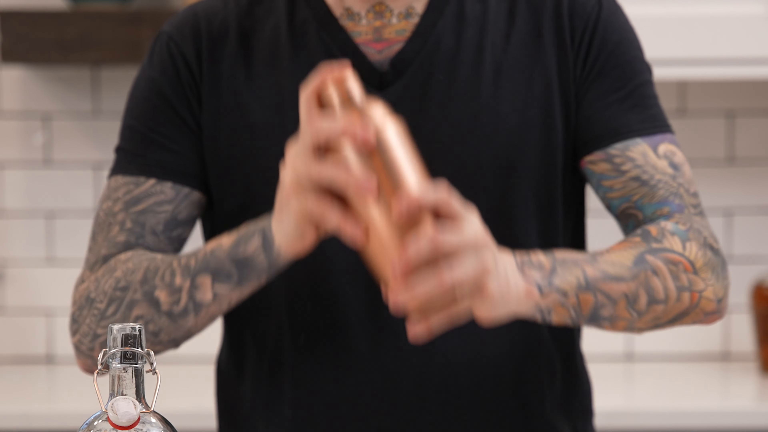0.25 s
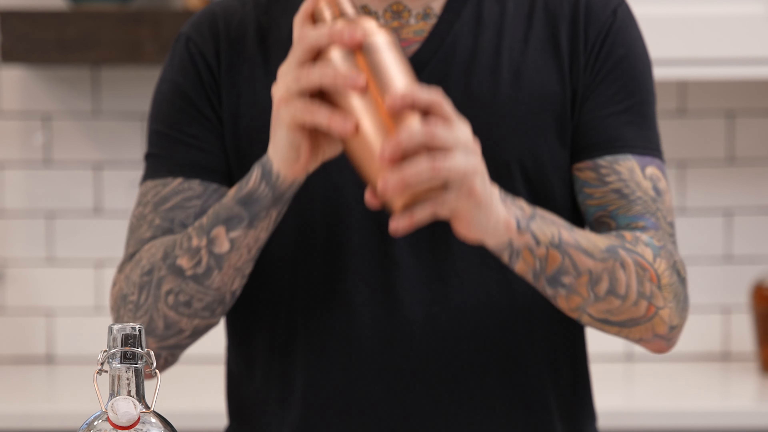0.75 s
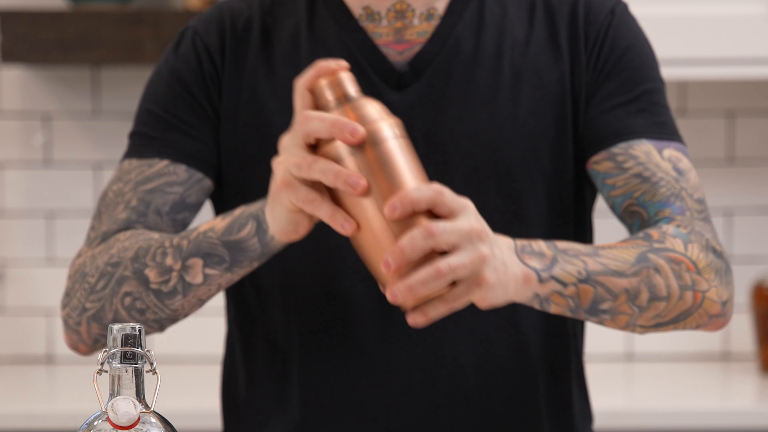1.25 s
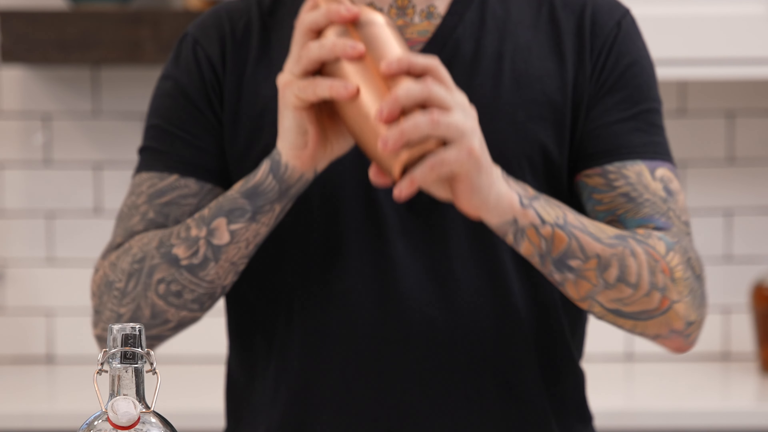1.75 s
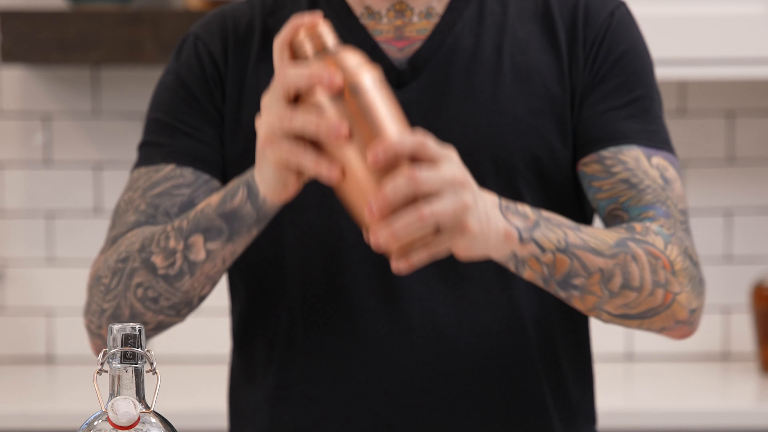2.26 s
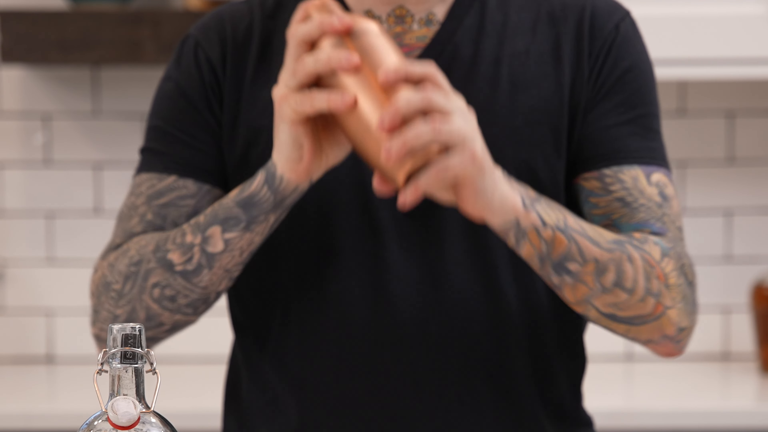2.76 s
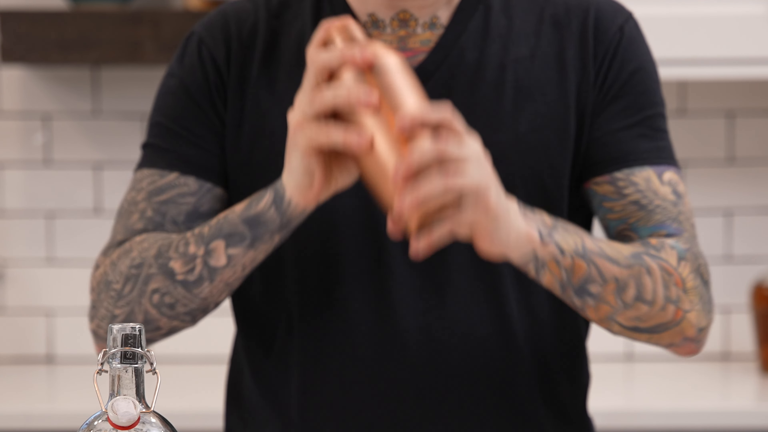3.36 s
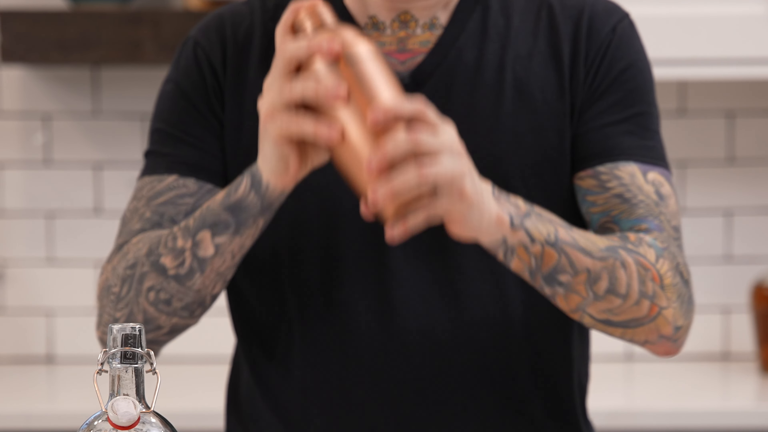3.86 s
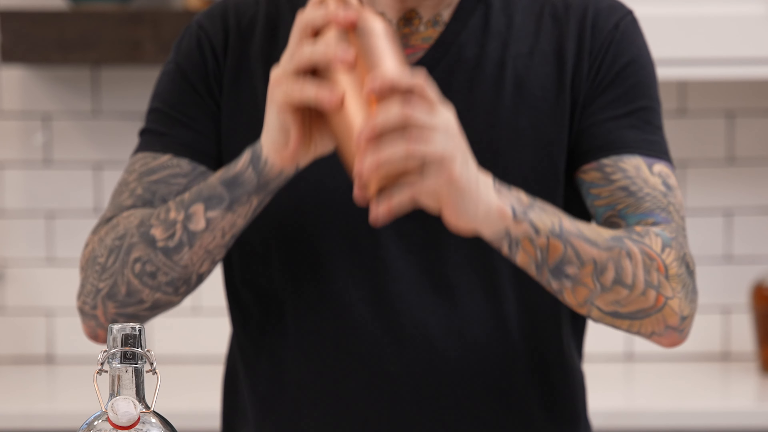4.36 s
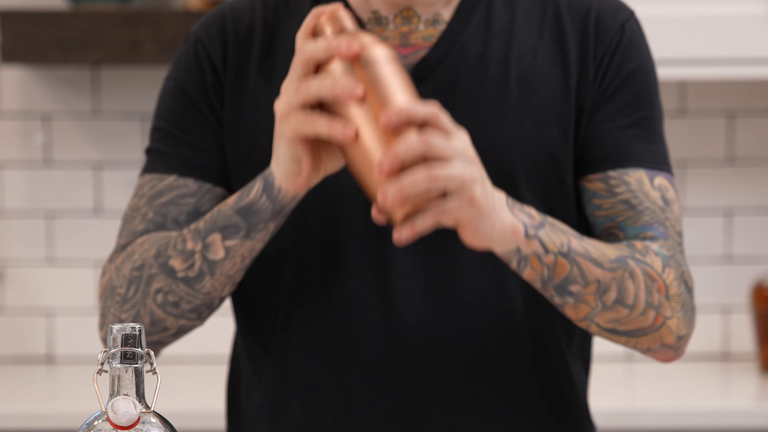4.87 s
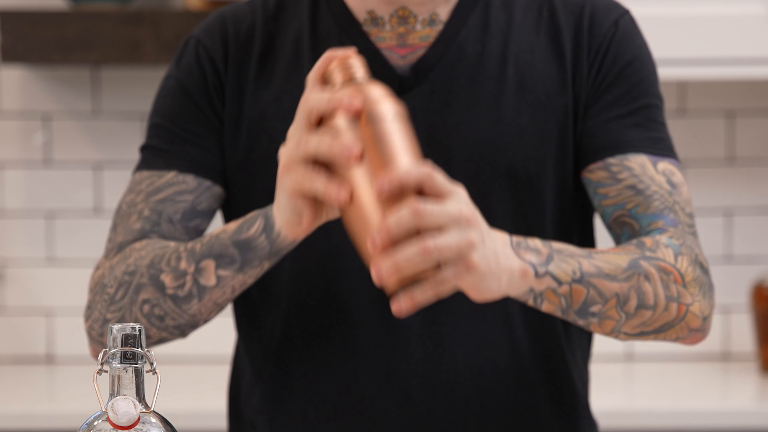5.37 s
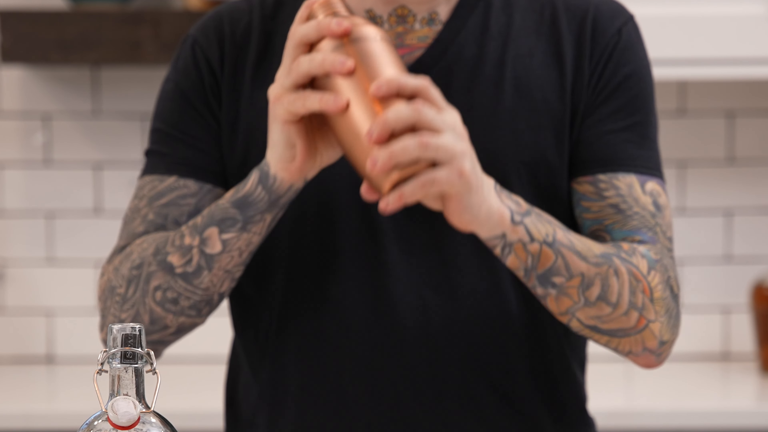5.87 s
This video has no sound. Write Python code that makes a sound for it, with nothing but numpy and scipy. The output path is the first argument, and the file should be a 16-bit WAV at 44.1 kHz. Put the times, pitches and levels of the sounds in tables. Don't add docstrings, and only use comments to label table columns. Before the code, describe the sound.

Vigorous cocktail shaking: about ten rattling ice impacts a second in a damped metal shell, sharp clacks over wet slosh, loud and slightly overdriven.

```python
import sys
import numpy as np
from scipy import signal
from scipy.fft import rfft, irfft, next_fast_len
from scipy.io import wavfile
from scipy.ndimage import uniform_filter1d, map_coordinates

SR = 44100
rng = np.random.default_rng(int(sys.argv[2]) if len(sys.argv) > 2 else 0)


def inscribe(sig):
    pcm = np.round(np.clip(np.atleast_2d(sig).T, -1, 1) * 32767)
    wavfile.write(sys.argv[1], SR, pcm.astype(np.int16))


def ratio(d):
    e = np.asarray(d, float) / 20
    return 10 ** e


N = 269892


def unit(x):
    return x / np.sqrt(np.mean(np.abs(x) ** 2) + 1e-20)


def along(points, hz):
    f, value = np.transpose(points)
    return np.interp(np.log(hz + 1), np.log(f + 1), value)


def filtered(x, response):
    m = next_fast_len(N + SR // 2)
    return irfft(rfft(x, m) * response(np.fft.rfftfreq(m, 1 / SR)), m)[:N]


def wobble(rate):
    knots = rng.standard_normal(int(N * rate / SR) + 4)
    return map_coordinates(knots, [np.arange(N) * rate / SR])


def ringing(x, modes):
    def response(f):
        total = 0
        for k, (centre, width, db) in enumerate(modes):
            damping = 1j * f * width
            total = total + (-1) ** k * ratio(db) * damping / (centre * centre - f * f + damping)
        return unit(total)
    return filtered(x, response)


# start_s, spread_s (of a pile-up), edge_db (re shell), heft_db (added to the body)
ICE = [
    (0, 0.017, -4.5, -3.5),
    (0.299, .011, -1.5, -0.5),
    (.9, .012, -7.5, 1),
    (1.5, .014, -7.5, 0.5),
    (2.3, .018, -6, -0.5),
    (3.5, .017, -3.5, 0.5),
    (4.5, .017, -2, 1),
    (6.1, .017, -2, -2),
]


def aged(s):
    when, *columns = np.transpose(ICE)
    return [np.interp(s, when, column) for column in columns]


# out_s, out_db, return_s, return_db
WARM_UP = [
    (.085, -15, 0.18, -14),
    (.293, -20, 0.39, -14),
    (.493, -15.5, .593, -16),
]
# out_s, out_db, return_s, return_db
SHAKES = [(.699, -15.5, .788, -15.5), (.89, -15.5, .976, -15.5), (1.075, -16, 1.164, -17),
          (1.267, -16, 1.354, -14), (1.461, -16.5, 1.546, -13.5), (1.647, -15.5, 1.745, -15.5),
          (1.85, -18, 1.938, -14), (2.04, -15.5, 2.133, -15), (2.242, -17.5, 2.338, -15),
          (2.442, -17.5, 2.528, -14), (2.639, -16, 2.735, -17), (2.836, -17.5, 2.926, -15),
          (3.031, -17.5, 3.125, -15.5), (3.233, -17, 3.32, -16.5), (3.429, -18, 3.515, -15.5),
          (3.625, -19, 3.711, -14.5), (3.82, -16.5, 3.912, -16), (4.022, -16.5, 4.114, -15.5),
          (4.221, -17, 4.312, -15), (4.413, -17.5, 4.507, -15), (4.608, -17, 4.709, -14),
          (4.816, -17, 4.908, -15), (5.027, -18.5, 5.112, -16), (5.215, -16.5, 5.311, -13.5),
          (5.415, -17, 5.511, -16), (5.613, -18.5, 5.705, -15), (5.806, -19.5, 5.899, -14.5),
          (6.001, -14.5, 6.091, -15)]


def strokes():
    s, db = np.reshape(np.concatenate([WARM_UP, SHAKES]), (-1, 2)).T
    back = np.arange(len(s)) % 2
    spread, edge_db, heft_db = aged(s)
    spread = spread * 1.12 ** back
    body_db = np.where(back, -6, 0.5) + heft_db
    return np.transpose([s, spread, db, body_db, edge_db - 2 * back])


# pitch_hz, t60_s
KITCHEN = [(200, 0.04), (2000, 0.41), (10000, 0.2)]


def kitchen(x, count=12):
    hz, t, z = signal.stft(rng.standard_normal((count, SR // 2)), SR, nperseg=256)
    decay = ratio(-60 * t / along(KITCHEN, hz)[:, None])
    tails = signal.istft(z * decay, SR, nperseg=256)[1]
    turn = np.arange(N) * 10 // SR % count == np.arange(count)[:, None]
    wet = signal.fftconvolve(x * turn, tails / np.linalg.norm(tails[0]), axes=1)
    return wet.sum(0)[:N]


def surge(rise, fall):
    t = np.arange(0, N, 32) / SR
    load = np.zeros(len(t))
    for s, spread, db, *_ in strokes():
        u = (t - s) / spread + 0.33
        load += ratio(db) * np.exp(-0.5 * (u / np.where(u < 0, rise, fall)) ** 2)
    return load.repeat(32)[:N]


# pitch_hz, level_db (per Hz)
SLOSH = [(15, -47), (25, -6.5), (249, -16.5), (503, -5), (1480, -5), (2110, 5.5), (2690, -2.5),
         (8360, -18.5), (16000, -28.5)]


def slosh():
    def wash_colour(f):
        return ratio(along(SLOSH, f) - 0.24 * np.log2(f / 4000 + 1))

    def spray_colour(f):
        return ratio(along(SLOSH, f) + 0.5 * np.log2(f / 2000 + 0.05))

    wash = unit(filtered(rng.standard_normal(N), wash_colour))
    spray = unit(filtered(rng.standard_normal(N), spray_colour))
    steady = ratio(-30.5 + 4.6 * wobble(90)) * wash
    return steady + ratio(-7 + 5.1 * wobble(300)) * surge(rise=1.0, fall=1.33) * spray


# start_s, peak_db
JOLT = [(0, -25.5), (2.5, -33.5), (6.1, -44)]
# start_s, peak_db, contact_s
THUDS = [
    (0.2936, -24, 0.0004),
    (.302, -15, 0.00106),
    (0.386, -7.5, 0.001),
    (3.607, -9, 0.0012),
]


def jolts():
    s = strokes().T[0]
    late, size, soft = rng.standard_normal((len(s), 3)).T
    back = np.arange(len(s)) % 2
    start_s = s + 0.004 + 0.0027 * late
    peak_db = np.interp(s, *np.transpose(JOLT)) + 2.5 * back + 1.1 * size
    usual = np.transpose([start_s, peak_db, 0.0045 * np.exp(0.27 * soft)])
    air = np.zeros(N + SR)
    for start, db, contact in [*usual, *THUDS]:
        u = np.arange(SR // 8) / (contact * SR)
        air[round(start * SR):][:len(u)] -= ratio(db + 7.5) * u * (2 - u) * np.exp(-u)
    return air[:N]


def notes(times, db, hz, t60, rise=0.00071):
    t = np.arange(SR // 25) / SR
    envelope = ratio(db[:, None] - 60 * t / t60[:, None]) * (1 - np.exp(-t / rise))
    wave = envelope * np.sin(2 * np.pi * hz[:, None] * t)
    at = np.clip(np.round(times * SR).astype(int)[:, None] + np.arange(len(t)), 0, N)
    return np.bincount(at.ravel(), wave.ravel(), N + 1)[:N]


# start_s, level_db (re the pile-up)
SING = [(0, -17), (1.5, -16), (2.5, -5), (4.3, -2.5), (6.1, -9)]


def singing(count=6):
    s, spread, db = strokes().T[:3, :, None]
    when, tune, force = np.moveaxis(rng.standard_normal((len(s), count, 3)), 2, 0)
    hz = 2070 * np.exp(0.0464 * (tune[:, :1] + 0.33 * tune))
    level_db = db + np.interp(s, *np.transpose(SING)) + 1.8 * force
    t60 = np.full(hz.shape, 0.037)
    return notes(*[r.ravel() for r in (s + spread * when, level_db, hz, t60)])


def chips(count=26):
    s, spread, db = strokes().T[:3, :, None]
    when, tune, life, force = np.moveaxis(rng.standard_normal((len(s), count, 4)), 2, 0)
    hz = np.clip(2970 * np.exp(0.7 * tune), 500, 12000)
    times = s + spread * (0.3 + 1.3 * when)
    level_db = db - 0.5 + 4 * force - 1.8 * np.abs(when)
    t60 = 5 / hz * np.exp(0.18 * life)
    return notes(*[r.ravel() for r in (times, level_db, hz, t60)], rise=0.0002)


def cube_notes(times, db, chance):
    kind, tune, life = chance
    in_shell = kind < 0
    hz = np.where(in_shell, 2060 * np.exp(0.076 * tune), 3300 * np.exp(0.386 * tune))
    cycles = np.where(in_shell, 40, 24)
    return notes(times, db, hz, cycles / hz * np.exp(0.3 * life))


def contacts(times, db, t60):
    at = np.clip(np.round(times * SR).astype(int), 0, N - 1)
    fall = ratio(-60 / (t60 * SR))
    force = signal.lfilter([1], [1, -fall], np.bincount(at, ratio(db), N))
    return uniform_filter1d(force, size=20) * rng.standard_normal(N)


# pitch_hz, width_hz, level_db
SHELL = [(1605, 1110, -5), (2060, 750, 0.5), (2880, 1800, -6), (4140, 1200, -6)]
# pitch_hz, width_hz, level_db
BODY = [(264, 423, -8.5), (555, 304, 1), (833, 424, 0), (1345, 566, -3)]
# pitch_hz, width_hz, level_db
EDGE = [(5050, 970, 9.5), (7400, 3040, 0)]
# pitch_hz, width_hz, level_db
SPLINTER = [(8100, 1600, 7.5), (14300, 7000, -12.5)]


def shaker(times, shell_db, body_db, edge_db, lasting):
    crisp_db = 2 * rng.standard_normal(len(times))
    top_db = shell_db + edge_db
    wall = ringing(contacts(times, shell_db, 0.0046 * lasting), SHELL)
    body = ringing(contacts(times, shell_db + body_db - 1.0, 0.0052 * lasting), BODY)
    edge = ringing(contacts(times, top_db - 0.5 * crisp_db, 0.0056 * lasting), EDGE)
    splinter = ringing(contacts(times, top_db - 3.0 + crisp_db, 0.0054 * lasting), SPLINTER)
    return wall + body + edge + splinter


def swarm(count=13, size=4):
    s, spread, shell_db, body_db, edge_db = strokes().T[:, :, None, None]
    back = np.arange(len(s))[:, None, None] % 2
    per_cube = rng.standard_normal((len(s), count, 1, 6))
    when, weight, dull, sharp, kind, tune = np.moveaxis(per_cube, 3, 0)
    chatter, force, life = np.moveaxis(rng.standard_normal((len(s), count, size, 3)), 3, 0)
    slam = 0.1697 * (1 - back) * (when ** 2 - 1)
    when = 1.05 * when + slam + 0.07 * when ** 3 + 0.3 * chatter
    size_db = shell_db - 5.0 + 2.3 * weight + 2.1 * np.clip(force, -3, 1.3) - 1.45 * np.abs(when)
    body_db = body_db + 3.6 * np.clip(dull, -3, 1.2) + 1.2 * np.tanh(when)
    edge_db = edge_db + 1.9 * sharp + 3 * back * np.minimum(when, 0)
    rows = np.broadcast_arrays(s + spread * when, size_db, body_db, edge_db, kind, tune, life)
    times, db, body_db, edge_db, *chance = [r.ravel() for r in rows]
    return shaker(times, db, body_db, edge_db, lasting=1.122) + cube_notes(times, db - 6, chance)


# start_s, shell_db, edge_db (re shell)
KNOCKS = [(0.0442, -5, -1.5), (0.0686, -3.5, -7), (.1764, -14, -1), (0.3018, -3.5, -9), (0.381, -2.5, -8),
          (0.47, -8.5, -7), (0.5797, -9, -5), (.6793, -8, -4), (0.6974, -12, -4), (0.874, -10, 3.5),
          (0.9658, -5.5, -6), (1.0713, -15, 2), (1.26, -12, -1), (1.62, -7, -4), (1.74, -4.5, -5),
          (1.8297, -10, -3), (1.8373, -4, -7), (2.2252, -6, -4), (2.7267, -1, -8), (2.8171, -5, -8),
          (2.8495, -4, -11), (3.2238, -12.5, 1), (3.4086, -8, 1), (3.6076, -10.5, 2.5), (3.831, -11, -1),
          (3.993, -12, 2), (4.5972, -7, -5), (4.714, -9, -7), (5.4969, -14, -17), (5.6166, -7.5, -8)]
# start_s, shell_db, edge_db (re shell)
CRACKS = [(0.282, -13, 1), (0.483, -21, 5), (.5862, -12.5, 3), (1.0559, -9, -6), (1.25, -4.5, -4),
          (1.4364, -8.5, -5), (1.448, -17, 8), (1.6316, -4, -4.5), (1.8447, -12, 1.5), (1.9996, -11, -3),
          (2.03, -14.5, 3.5), (2.4166, 1.5, -9.5), (2.5979, -4.5, -5), (2.62, -16, 2), (2.704, -6.5, -11),
          (3.028, -8.5, -0.5), (3.2157, -2, -6), (3.732, -12, -8), (3.7943, -9.5, 0), (3.901, -7, -6),
          (4.0037, -11.5, -5), (4.19, -23, 7), (4.399, -2.5, -11), (4.7712, -15, 3.5), (4.9865, -14, 3.5),
          (5.0063, -14, 4), (5.0971, -3, -11.5), (5.5933, -5, -6), (5.7767, -8, 1), (5.9673, -21, 10)]
# start_s, shell_db, edge_db (re shell)
GLANCES = [(.0591, -9, -7), (.1628, -10, -6), (.7827, -10, 2), (.901, -11, -17), (.9775, -9, 1.5),
           (1.039, -15, -14), (1.067, -9, 2), (1.157, -7.5, 0), (1.3584, -12.5, -2), (1.5519, -8, -6),
           (1.6532, -9, -5), (2.1276, -8.5, -1.5), (2.325, -7.5, -7), (2.337, -17, 2), (2.6024, -13, -5),
           (2.8372, -17, 1), (2.9368, -15, 5.5), (3.3094, -11.5, 3.5), (3.5303, -10.5, -4),
           (4.2036, -5.5, -3), (4.4845, -12, -0.5), (4.692, -9, -14), (4.9291, -7, -12), (5.1181, -9, -9),
           (5.2077, -14, 3), (5.2954, -6, -14), (5.4887, -6, -18), (5.6886, -5.5, -21), (5.8168, -7.5, -5),
           (5.9836, -16, -6)]
# start_s, shell_db
TAPS = [(.002, -17), (.031, -39), (.109, -5), (0.1184, -8), (0.2663, -13), (0.3324, -9), (.35, -8),
        (0.603, -11), (0.819, -13), (1.0459, -9), (1.2315, -11.5), (1.9176, -4.5), (1.9796, -17),
        (2.3175, -9), (2.5528, -16), (2.6086, -5), (2.8786, -19), (3.1681, -17), (3.349, -13),
        (3.9369, -18), (4.1457, -13), (4.535, -10), (4.9465, -13.5), (5.1383, -11), (5.161, -14),
        (5.1758, -9.5), (5.372, -6), (5.389, -8), (5.548, -9.5), (6.097, -6.5)]


def singles():
    rows = []
    for blows, body_db in ((KNOCKS, -2.5), (CRACKS, -12.5), (GLANCES, -7.5)):
        for s, db, edge_db in blows:
            heft_db = aged(s)[2]
            rows.append((s, db, body_db + heft_db, edge_db))
    return rows + [(s, db, -17, -14.5) for s, db in TAPS]


# start_s, peak_db, pitch_hz, t60_s
RINGS = [(0.069, -9, 880, 0.027), (0.293, -7.5, 480, 0.031), (0.587, -11, 1380, .03),
         (1.92, -9, 1185, 0.046), (2.735, -14, 1240, 0.046), (3.035, -9, 600, 0.045),
         (5.49, -13, 740, 0.029), (5.6, -10, 703, 0.031), (0.381, 0, 2730, 0.019), (0.58, 0, 2910, 0.021),
         (0.966, -3, 3000, 0.027), (1.261, -6, 5210.0, 0.026), (1.631, -10, 1770, 0.046),
         (2.022, -13, 1886, 0.033), (2.313, -12, 2120.0, 0.038), (2.737, -18, 2100, 0.16),
         (2.817, 2.5, 1900, 0.017), (3.408, -6, 1970, 0.04), (3.613, -3.5, 2070, 0.022),
         (3.821, -6, 2060.0, 0.033), (4.107, -6, 2070, 0.025), (4.284, -13, 2010, 0.097),
         (4.319, -11, 2040, 0.043), (4.405, -4, 1940, 0.032), (4.503, -19, 2070.0, 0.06),
         (4.597, -3, 2080, 0.024), (4.722, -9, 2130, 0.037), (4.826, -10.5, 2105, 0.047),
         (5.202, -3, 2060, 0.027), (5.601, -9, 1930, 0.03)]


def clacks():
    s, shell_db, body_db, edge_db = np.transpose(singles())
    chance = rng.standard_normal((len(s), 3)).T - [[1], [0], [0]]
    own = cube_notes(s, shell_db - 8, chance)
    blows = shaker(s, shell_db + 3.0, body_db, edge_db, lasting=1.13)
    return blows + own + notes(*np.transpose(RINGS))


def scene():
    ice = clacks() + swarm() + chips() + singing()
    return (ice + ratio(-10.0) * kitchen(ice) + slosh() + jolts())[None]


def top_cut(x):
    return signal.sosfilt(signal.butter(12, 16660, fs=SR, output="sos"), x)


def record(dry):
    held = dry[0] / (1 + np.abs(dry[0] / 0.9) ** 6) ** (1 / 6)
    mix = filtered(held, lambda hz: 1 / (1 + (hz / 15800) ** 300))[None]
    return top_cut(mix)


dry = scene()
out = record(dry)
inscribe(out)
```